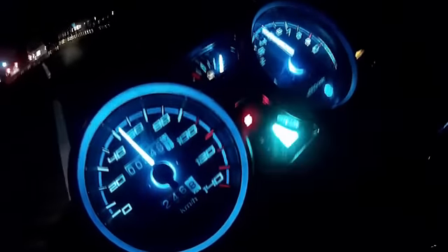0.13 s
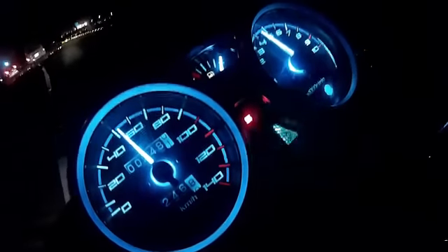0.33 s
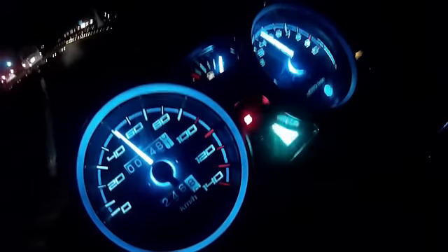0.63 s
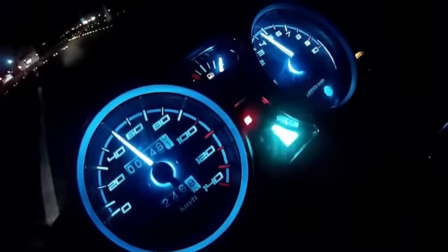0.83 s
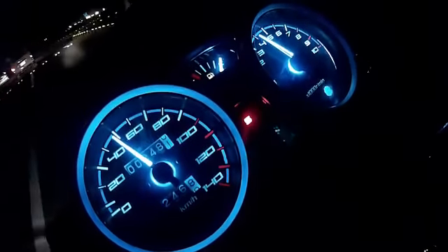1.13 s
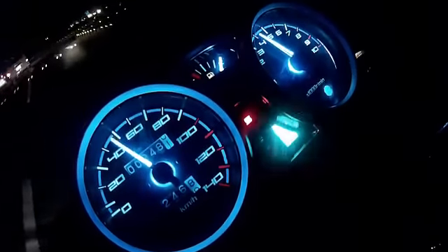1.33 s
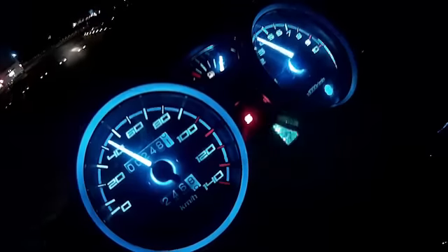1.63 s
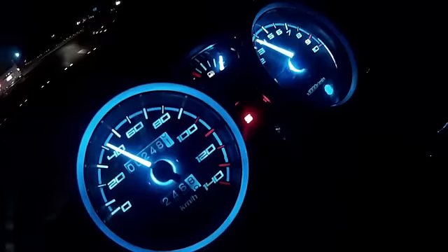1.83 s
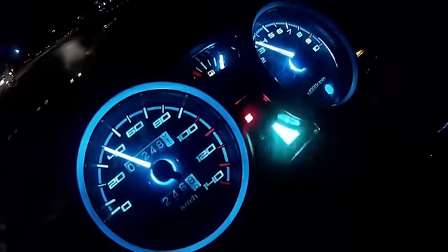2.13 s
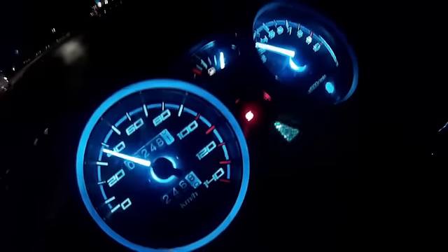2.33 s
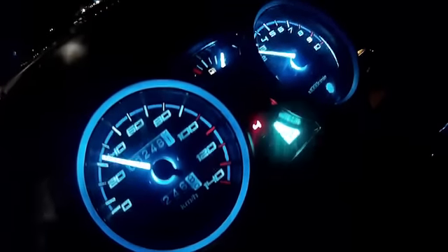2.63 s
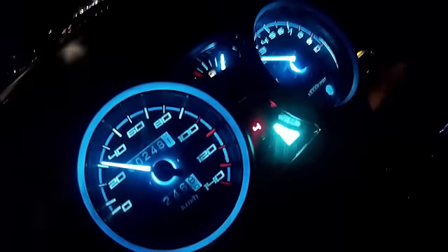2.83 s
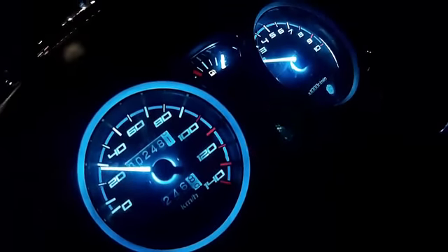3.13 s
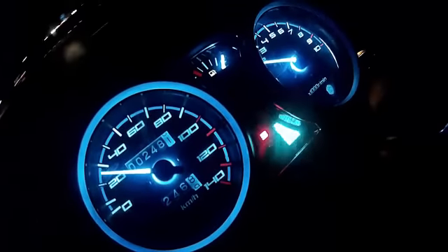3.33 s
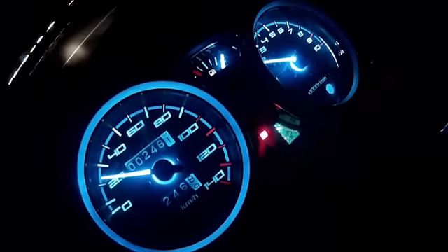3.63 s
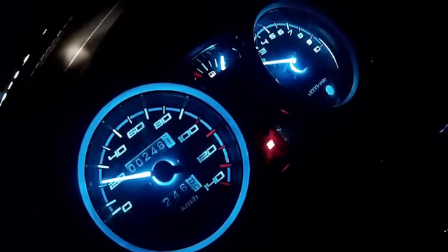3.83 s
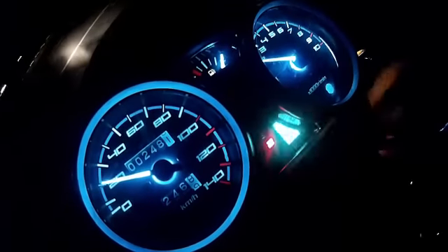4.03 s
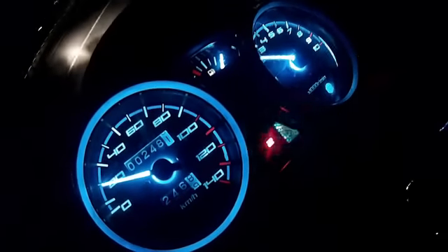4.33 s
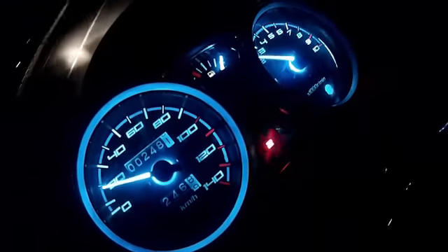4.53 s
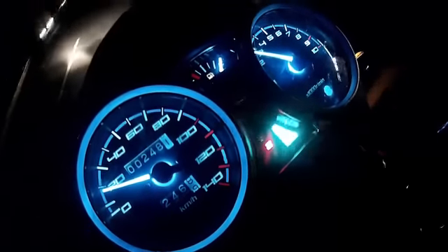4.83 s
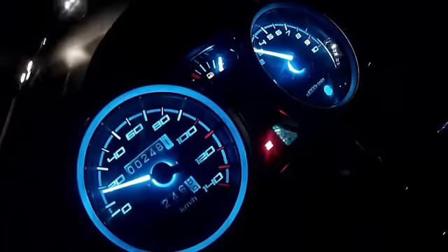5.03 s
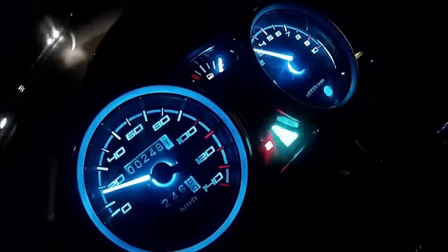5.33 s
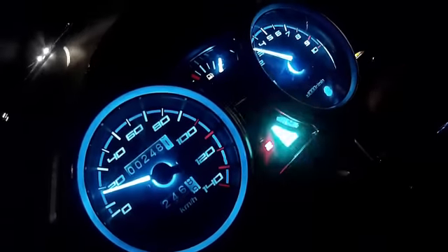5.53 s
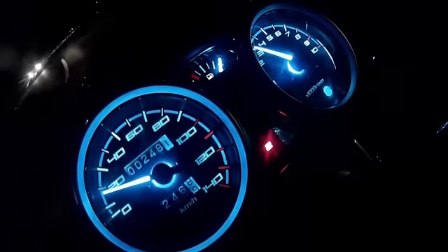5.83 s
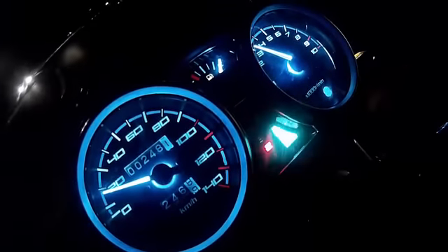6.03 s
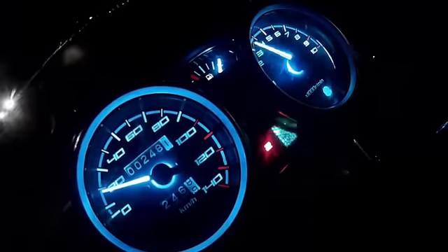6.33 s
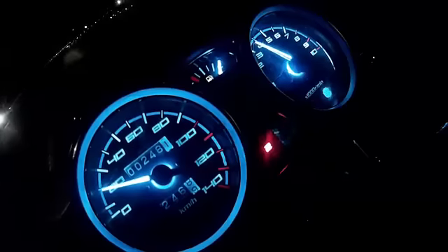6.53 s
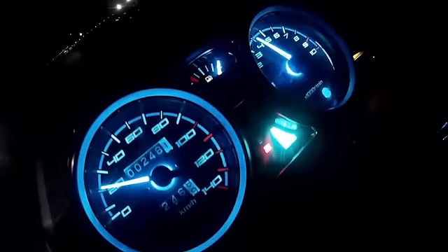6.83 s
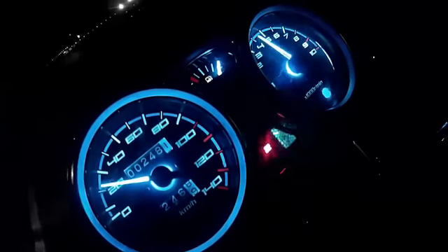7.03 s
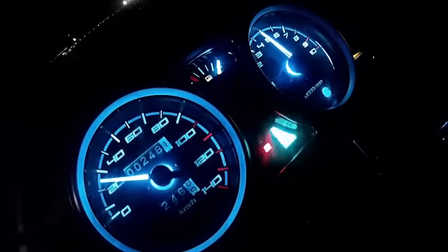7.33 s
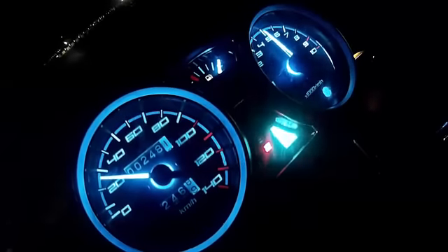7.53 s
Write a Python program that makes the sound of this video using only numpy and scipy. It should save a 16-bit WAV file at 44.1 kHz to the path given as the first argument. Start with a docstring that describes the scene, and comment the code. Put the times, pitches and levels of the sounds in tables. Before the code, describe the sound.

A small four-stroke single-cylinder motorcycle slows in gear, its humming, rattling drone sliding lower for two seconds. It drops to a soft, clattering idle with road bumps thudding through the bodywork. The throttle then opens with knocks and lumpy firing, and the engine climbs to a harder bark before cutting briefly for a gear change. Close, mono, rider's position on the road.

```python
"""A small single-cylinder four-stroke motorcycle runs down in gear, idles with the clutch in, then pulls away
and shuts the throttle for a gear change. With the throttle open its firings thump, crack and rasp as filtered
pulses; knocks of piston and valves set the cylinder clattering. Sines locked to the engine cycle make the crank
hum and drive whine; crank strokes, road grain and bumps shake noise through the resonances of the bodywork."""
import sys
import numpy as np
from scipy import signal
from scipy.fft import rfft, irfft
from scipy.io import wavfile
from scipy.ndimage import uniform_filter1d

SR = 44100
rng = np.random.default_rng(int(sys.argv[2]) if len(sys.argv) > 2 else 0)


def int16_out(signal):
    """Quantize to a 16-bit WAV file."""
    q = np.round(np.clip(np.atleast_2d(signal).T, -1, 1) * 32767)
    wavfile.write(sys.argv[1], SR, q.astype(np.int16))


N = 339570
T = np.arange(N) / SR

# the rider's hand on the throttle: t/s, opening/0-1
THROTTLE = [(4.54, 0), (4.7, 0.63), (4.87, 0.35), (4.99, 0.56), (6.3, 0.65), (6.88, 1), (7.388, 1),
            (7.43, 0.01), (7.6, 0.46), (7.7, 0.55)]
# main tones of the drive in high gear: multiple of the firing rate, level/dB
HIGH_ORDERS = [(9, 0.5), (17, -21.5), (18, -18.5)]
# low resonances of the bodywork: f/Hz, level/dB
BOOM = [(25, -47.5), (70, -13.5), (110, -16.5), (145, -2), (180, 6.5), (222, 7.5), (270, 2), (310, -8.5),
        (400, -54.5)]
# buzzing resonances of the panels: f/Hz, level/dB
PANELS = [(260, -19.5), (335, -6), (375, 1), (430, 2), (550, -0.5), (670, -19), (810, -11), (910, -25),
          (1005, -10.5), (1090, -18.5), (1250, -5.5), (1380, -13), (1900, -13.5), (2700, -51)]
# colour of the clattering cylinder and valve gear: f/Hz, level/dB
VALVES = [(500, -21.5), (900, -10.5), (1130, -32), (1250, -9), (1370, -18.5), (1540, -1.5), (1655, 9),
          (1770, -3), (1930, -4.5), (2080, -58), (2350, -27), (2750, -35.5), (6000, -55), (15500, -76)]
# colour of a sharp, dry knock: f/Hz, level/dB
CRACK = [(500, 11.5), (1000, 16.5), (1400, -1), (1700, 41), (1950, 29.5), (2100, 18), (2400, 16),
         (2750, -10.5), (3600, 4.5), (5000, -3), (8000, -5.5), (11000, 5), (15500, -21)]
# thin metal parts that ring on: f/Hz, width/Hz, level/dB
RINGS = [(6110, 73, -2), (6180, 80, -5.5), (9700, 60, -6), (10450, 130, 9), (11200, 60, -16),
         (12150, 120, -13), (11700, 50, -1.5), (12322, 50, -3), (12560, 100, -13), (13350, 54, -9),
         (13600, 99, 11), (14770, 60, -19)]

# when each gear drives the wheel: (drive engages s, drive releases s)
HIGH_GEAR_S, LOW_GEAR_S, NEXT_GEAR_S = (0, 2.12), (4.9, 7.4), (7.55, 7.7)
IDLE_HZ, SLOW_KMH = 10.73, 24.6  # firings per second and road speed at which the idle levels hold
LUG_HZ, LUG_SPAN_HZ = 23.74, 2.7  # lugging starts below this firing rate and is full a span lower
SHELL_HZ, SHELL_WIDTH_HZ = 222.3, 66  # resonance of the shell


def undb(db):
    """Decibels to gain."""
    return 10 ** (np.asarray(db) / 20)


def curves(table):
    """Each column of a table, joined by straight lines in time."""
    s, *columns = np.transpose(table)
    return [np.interp(T, s, column) for column in columns]


def during(span, fade_s=0.021):
    """One from the start to the end of a span, fading to nothing outside it."""
    inside_s = np.minimum(T - span[0], span[1] - T)
    return np.clip(1 + inside_s / fade_s, 0, 1)


def noise():
    """White noise."""
    return rng.standard_normal(N)


def steady(x, size=9000):
    """Even out the strength over a window of samples; single blows keep their shape."""
    power = uniform_filter1d(uniform_filter1d(x * x, size), size // 2)
    return x / np.sqrt(np.abs(power) + 1e-12)


def walk(rate):
    """Slow random wander: ramps between fresh values, rate of them a second."""
    hold = int(SR / rate)
    steps = np.repeat(rng.standard_normal(N // hold + 1), hold)
    return 1.86 * uniform_filter1d(steps, hold)[:N]


def colour(x, points, size=8192):
    """Minimum-phase filter through (Hz, dB) points: it rings after a blow, never before."""
    hz, db = np.transpose(points)
    f = np.fft.rfftfreq(size, 1 / SR) + 1
    gain = undb(np.interp(np.log(f), np.log(hz), db))
    cepstrum = irfft(np.log(gain))
    # folding the cepstrum onto its first half makes the response causal
    cepstrum[1:size // 2] *= 2
    cepstrum[size // 2 + 1:] = 0
    response = irfft(np.exp(rfft(cepstrum)))
    return signal.fftconvolve(x, response / np.linalg.norm(response))[:N]


def ring(x, modes):
    """Damped resonances (Hz, width Hz, dB) driven by x."""
    out = 0
    for hz, width, db in modes:
        pole = np.exp((2j * np.pi * hz - np.pi * width) / SR)
        mode = signal.lfilter([1], [1, -pole], x).imag
        out = out + undb(db) * np.sqrt(width) * mode
    return out


def die_away(x, decay_s):
    """Every impulse dies away exponentially."""
    return signal.lfilter([1], [1, -np.exp(-1 / (decay_s * SR))], x)


def delay(x, lag_s):
    """The same sound later, or earlier where the lag is negative."""
    return np.interp(T - lag_s, T, x, left=0)


def strikes(cycles, place, scatter_db, jitter_s):
    """One impulse per engine cycle at the given place, each with its own size and timing."""
    turns = np.arange(place, cycles[-1], 1)
    turns = turns[turns > cycles[0]]
    chance = rng.standard_normal((len(turns), 2))
    at = (np.interp(turns, cycles, T) + jitter_s * chance[:, 0]) * SR
    sizes = undb(scatter_db * chance[:, 1])
    return np.bincount(np.clip(at.astype(int), 0, N - 1), sizes, N)


def grains(rate, spread_db):
    """Impulses at random moments, rate of them a second, with random sizes that are mostly small."""
    hits = rng.random(N) < rate / SR
    return hits * undb(spread_db * np.minimum(rng.exponential(size=N), 3))


def texture(cycles, repeat):
    """Contact noise of turning parts: a share of it returns at the same place in every engine cycle."""
    size = 1100  # noise values round one cycle
    turn = np.interp(cycles * size, np.arange(size), rng.standard_normal(size), period=size)
    return np.sqrt(repeat) * turn + np.sqrt(1 - repeat) * noise()


def near_shell(hz):
    """How near a tone is to the resonance of the shell, 0-1."""
    return 1 / (1 + (2 * (hz - SHELL_HZ) / SHELL_WIDTH_HZ) ** 2)


def resonating(rate):
    """How strongly the high gear's main tone shakes the shell, 0-1."""
    main_order = HIGH_ORDERS[0][0]
    return during(HIGH_GEAR_S) * near_shell(main_order * rate)


def hum(cycles, rate, orders, waver_db, shell_db=0):
    """Tones locked to the engine cycle, each wavering in strength and lifted near the shell's resonance."""
    out = 0
    for order, db in orders:
        level_db = db + waver_db * walk(25) + shell_db * near_shell(order * rate)
        out = out + undb(level_db) * np.sin(2 * np.pi * (order * cycles + rng.random()))
    return np.sqrt(2) * out


def lugging(rate):
    """Zero while the engine spins freely, one at low engine speed."""
    return np.clip((LUG_HZ - rate) / LUG_SPAN_HZ, 0, 1)


def pulling(fade_s):
    """One from the first opening of the throttle on, fading in just before it."""
    return during((THROTTLE[0][0], THROTTLE[-1][0]), fade_s)


def shaken(rate, speed, throttle, idle_db, engine_db, road_db, throttle_db):
    """Level in dB, growing per doubling of engine and of road speed and changing with throttle opening."""
    engine_octaves = np.log2(rate / IDLE_HZ)
    road_octaves = np.log2(speed / SLOW_KMH)
    return idle_db + engine_db * engine_octaves + road_db * road_octaves + throttle_db * throttle


def bodywork(cycles, boom_db, buzz_db):
    """Road grain and crank strokes shake the tank and headlamp shell, which boom and buzz."""
    blows = strikes(cycles, 0, scatter_db=4.5, jitter_s=0.0011)
    blows = blows + .5 * strikes(cycles, .55, scatter_db=7.0, jitter_s=0.0018)
    road_grain = 0.19 * grains(rate=90, spread_db=5.5)
    # the strokes come through strongly in high gear and from the opening of the throttle on
    load = 0.24 + np.maximum(during(HIGH_GEAR_S), pulling(fade_s=0.11))
    shaking = load * steady(die_away(blows + road_grain, decay_s=0.0084)) + 1.07
    boom = steady(colour(shaking * texture(cycles, repeat=0.16), BOOM), size=3000)
    buzz = steady(colour(shaking * texture(cycles, repeat=0.24), PANELS))
    return boom * undb(boom_db) + buzz * undb(buzz_db)


def bumps(decay_s=0.03, rebound_s=0.0291):
    """A jolt thuds through the bodywork, and loose parts rattle twice as they rebound."""
    # bumps in the road, and the first strong firings as the clutch bites: t/s, thud level/dB, rattle level/dB
    jolts = [(0.893, -11.5, -34), (2.056, -30, -29), (2.548, -13.5, -30), (3.278, -22, -30.5),
             (3.795, -14.5, -35), (4.709, -11.5, -22.5), (4.809, -13.5, -29)]
    jolt, loose = np.zeros(N), np.zeros(N)
    for s, thud_db, rattle_db in jolts:
        jolt[int(s * SR)] = undb(thud_db)
        loose[int(s * SR)] = undb(rattle_db)
    thud = colour(jolt + .5 * delay(jolt, rebound_s), BOOM) * undb(23.5)
    shudder = colour(die_away(jolt, decay_s) * noise(), PANELS) * undb(-14)
    contact = die_away(loose + 0.12 * delay(loose, rebound_s), decay_s=0.025)
    clatter = colour(contact * noise(), VALVES) * undb(-8.5)
    crackle = colour(contact * noise(), CRACK) * undb(-6.5)
    return thud + shudder + clatter + crackle


def drive(cycles, rate, high_db=-26, low_db=-35, next_db=-25, shell_db=8.5):
    """The drive whines on its own multiples of the firing rate in each gear."""
    # tones in low gear: multiple of the firing rate, level/dB
    low_orders = [(7, -7), (8, -1.5), (9, 0), (11, -2), (13, -8)]
    # tones as the next gear takes up the load: multiple of the firing rate, level/dB
    take_up_orders = [(5, -16), (6, 0.5), (8, -6.5), (15, -1.5), (16, -23)]
    # in high and low gear the tones swell near the shell's resonance
    high = hum(cycles, rate, HIGH_ORDERS, waver_db=1.6) * undb(high_db + shell_db * resonating(rate))
    low = hum(cycles, rate, low_orders, waver_db=3.5, shell_db=5) * undb(low_db)
    take_up = hum(cycles, rate, take_up_orders, waver_db=5.1) * undb(next_db)
    in_gear = during(HIGH_GEAR_S) * high + during(LOW_GEAR_S) * low
    return in_gear + during(NEXT_GEAR_S, fade_s=0.047) * take_up


def crank(cycles, rate):
    """Running down in gear, the crank hums on its orders and shakes loose parts."""
    # orders of the crank hum: multiple of the firing rate, level/dB
    crank_orders = [(2, -21.5), (4, -1.5), (6, -5), (7, 1.5), (8, -0.5)]
    # colour of the loose parts: f/Hz, level/dB
    rattle_colour = [(400, 7.5), (650, 29.5), (900, 22), (1250, 28.5), (1900, 11), (2300, 17.5),
                     (2700, -4.5), (3300, -2.5), (5000, -9), (8000, -15.5), (11000, -1), (15500, -10)]
    blows = strikes(cycles, 0, scatter_db=7.5, jitter_s=0.0019) + 1.7 * grains(rate=130, spread_db=3.0)
    rattle = steady(colour(die_away(blows, decay_s=0.0049) * noise(), rattle_colour))
    # the rattle falls away at low engine speed and rises as the shell resonates
    rattle_db = -33.5 - 14 * lugging(rate) + 2.5 * resonating(rate)
    tones = hum(cycles, rate, crank_orders, waver_db=1.2)
    hum_db = -28 + 22.5 * np.log2(rate / 32.7)  # growth per doubling of the firing rate
    return during(HIGH_GEAR_S) * (tones * undb(hum_db) + rattle * undb(rattle_db))


def hard_knocks(decay_s=0.0059, clatter_db=-3, ring_db=-24):
    """Some knocks of the engine come harder, and the cylinder rings."""
    # single hard engine knocks: t/s, level/dB
    blows_at = [(2.5004, -25.5), (2.9944, -32), (3.6388, -26), (4.0604, -20.5), (4.389, -29),
                (4.568, -20.5), (4.665, -24), (4.9683, -14.5), (5.1696, -15)]
    blows = np.zeros(N)
    for s, db in blows_at:
        blows[int(s * SR)] = undb(db)
    contact = die_away(blows, decay_s)
    clatter = colour(contact * noise(), VALVES) * undb(clatter_db)
    ringing = contact * steady(ring(noise(), RINGS)) * undb(ring_db)
    return clatter + ringing


def valve_gear(cycles, clatter_db):
    """Piston and tappets knock on the finned cylinder, which clatters and rings."""
    # blows of piston and valves: place in the cycle/0-1, level/dB
    knocks = [(.01, -7), (.22, -12.5), (0.579, -7), (0.799, -8)]
    # cooling fins: f/Hz, width/Hz, level/dB
    fins = [(1651, 16, -3), (1773, 40, -7.5), (1923, 23, -7.5)]
    # high rings that sing until the throttle opens: f/Hz, width/Hz, level/dB
    singing_modes = [(7540, 25, -10), (7940, 24, -10), (11596, 40, -7), (11670, 20, -2), (12200, 20, 0),
                     (12548, 40, -6)]
    blows = sum(undb(db) * strikes(cycles, place, scatter_db=1.5, jitter_s=.0006) for place, db in knocks)
    force = steady(die_away(blows, decay_s=0.0066))
    rubbing = steady(colour((force + .3) * texture(cycles, repeat=.5), VALVES))
    # every knock also leaves a short clean ring in the cooling fins
    fin_ring = steady(ring(ring(blows, fins), [(1680, 610, 0)]))
    clatter = (rubbing + 0.26 * fin_ring) * undb(-1.0)
    rings = steady(ring((force + .5) * noise(), RINGS)) * undb(-21)
    singing = steady(ring(noise(), singing_modes)) * undb(-24)
    singing = singing * (1 - 0.86 * pulling(fade_s=.5))
    return (clatter + rings + singing) * undb(clatter_db)


def firings(cycles, rate, throttle, pipe_s=0.0074, echo=0.74):
    """Each firing cracks and sends a pressure pulse and a rasp of gas down the pipe; both come back from its end."""
    # colour of the pressure pulse: f/Hz, level/dB
    thump_colour = [(30, -38), (60, -18), (85, -1.5), (120, 2.5), (170, 1.5), (260, 1), (400, -19),
                    (550, -9.5), (800, -25.5), (1300, -16.5), (2000, -35), (2700, -60)]
    # colour of the gas rasp: f/Hz, level/dB
    gas_colour = [(400, 11), (700, 12), (1000, 14), (1700, 15), (2250, 9.5), (2700, -3), (3150, 6.5),
                  (3600, -3.5), (4050, 0.5), (5000, -13), (8000, -16.5), (11000, -12), (15500, -22)]
    fired = strikes(cycles, 0, scatter_db=1.5, jitter_s=.0001)
    pulses = fired + echo * delay(fired, pipe_s)
    # the thump leads the crack slightly
    thump = steady(-colour(delay(pulses, -0.0011), thump_colour))
    # the knock is one sharp edge with a short splintery tail
    splinters = .13 * die_away(fired, decay_s=.002) * noise()
    crack = steady(-colour(fired + splinters, CRACK))
    gas = steady(colour(die_away(pulses, decay_s=0.0049) * texture(cycles, repeat=0.17), gas_colour))
    # at low speed the firing is a dry knock; the gas rasp takes over as the flow grows
    flow = np.clip((rate - 23) / 9, .03, 1)
    dry_knock = crack * undb(18.0) * np.sqrt(np.clip(1 - 0.89 * flow, 0, 1))
    rasp = gas * undb(11) * np.sqrt(flow)
    # thump and bark grow as powers of the throttle opening; lugging weakens the thump
    thump_gain = throttle ** 1.16 * undb(-17 - 8 * lugging(rate))
    bark_gain = throttle ** 2.67 * undb(-42)
    return thump * thump_gain + (dry_knock + rasp) * bark_gain


def scene(road_db=0.37, uneven_db=0.5):
    """One engine cycle times the turning layers; speed and throttle set the levels, which waver a little."""
    # engine speed: t/s, firing rate/Hz
    revs = [(0.0, 32.62), (0.45, 32.03), (1.05, 28.4), (1.6, 24.31), (2.13, 20.36), (2.5, 10.57),
            (3.45, 10.28), (4.0, 11.87), (4.7, 20.99), (4.87, 18.62), (5.0, 19.95), (5.45, 21.18),
            (6.1, 26.12), (6.75, 33.16), (7.38, 40.81), (7.53, 26.16), (7.7, 29.76)]
    # road speed: t/s, speed/(km/h)
    road = [(0, 62), (2.0, 46), (3.0, 38), (4.0, 22), (5.0, 29), (6.2, 21), (7.7, 30)]
    rate, = curves(revs)
    speed, = curves(road)
    throttle = np.clip(curves(THROTTLE)[0], 0, 1)
    cycles = np.cumsum(rate) / SR - .5
    # during the gear change the drive hangs slack; bodywork and cylinder shake more
    slack = during((LOW_GEAR_S[1], NEXT_GEAR_S[1]), fade_s=0.01)
    bumpy_db = road_db * walk(9)
    state = rate, speed, throttle
    boom_db = shaken(*state, idle_db=-27.5, engine_db=4.0, road_db=0.5, throttle_db=-5.0)
    boom_db = boom_db + bumpy_db + 2.5 * slack
    buzz_db = shaken(*state, idle_db=-38.5, engine_db=5.5, road_db=2.5, throttle_db=5)
    buzz_db = buzz_db + bumpy_db + 4.5 * slack + 4 * resonating(rate)
    clatter_db = shaken(*state, idle_db=-42.5, engine_db=6, road_db=0.27, throttle_db=10)
    clatter_db = clatter_db + uneven_db * walk(12) + 4.5 * slack
    # the cylinder clatters harder as the engine labours under load
    clatter_db = clatter_db + 3 * lugging(rate) * throttle
    shell = bodywork(cycles, boom_db, buzz_db) + bumps()
    turning = drive(cycles, rate) + crank(cycles, rate)
    cylinder = hard_knocks() + valve_gear(cycles, clatter_db)
    return (shell + turning + cylinder + firings(cycles, rate, throttle))[None]


def record(dry):
    """Soft saturation rounds the highest peaks, and a steep low-pass cuts the top."""
    rounded = np.tanh(.6 * dry) / .6
    top_hz = 15700
    low_pass = signal.ellip(10, .2, 80, top_hz, fs=SR, output="sos")
    return signal.sosfilt(low_pass, rounded)


dry = scene()
out = record(dry)
int16_out(out)
```